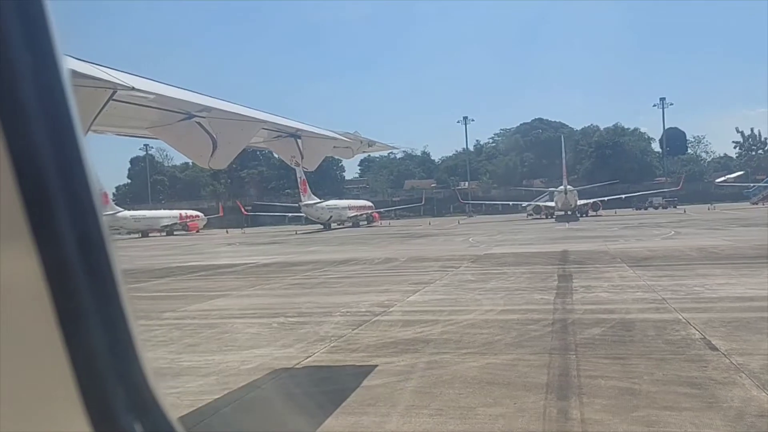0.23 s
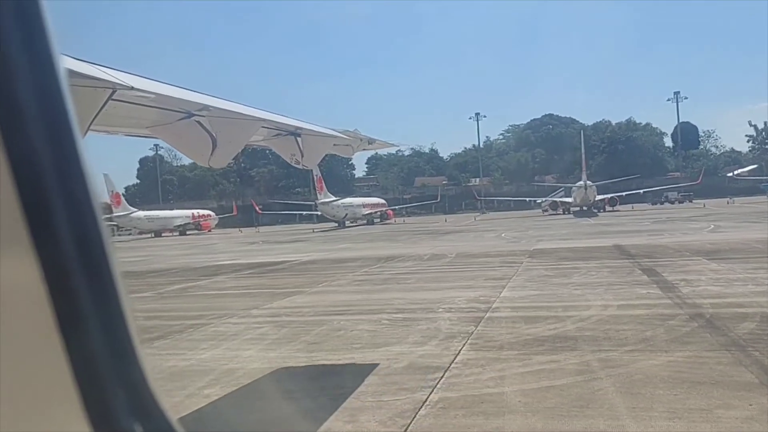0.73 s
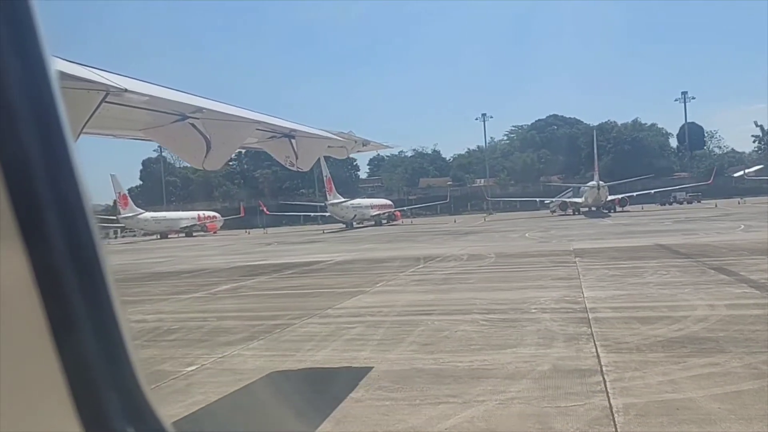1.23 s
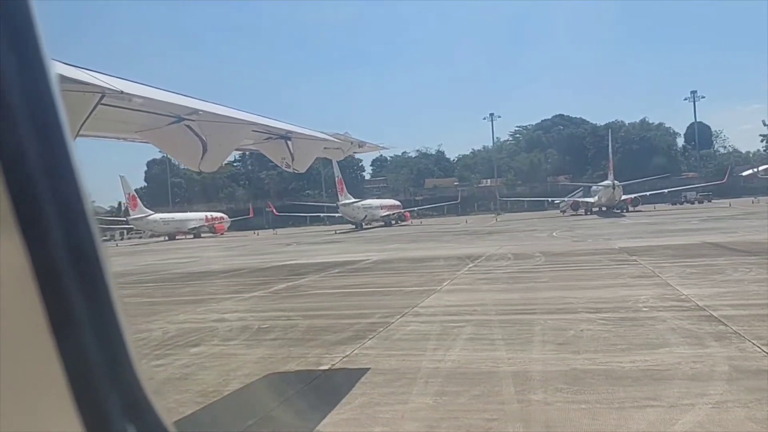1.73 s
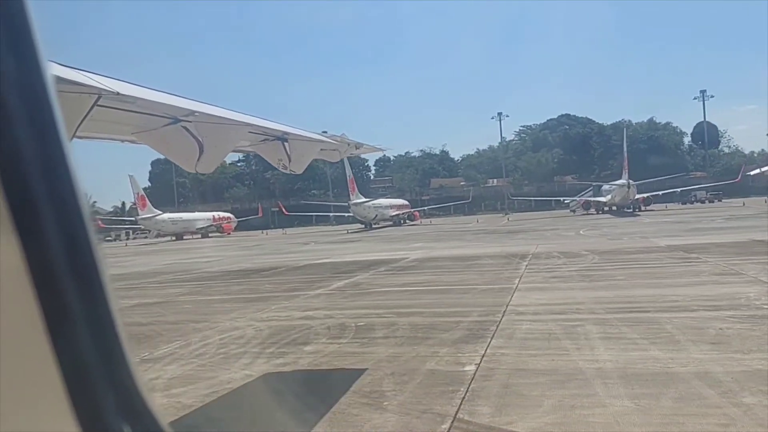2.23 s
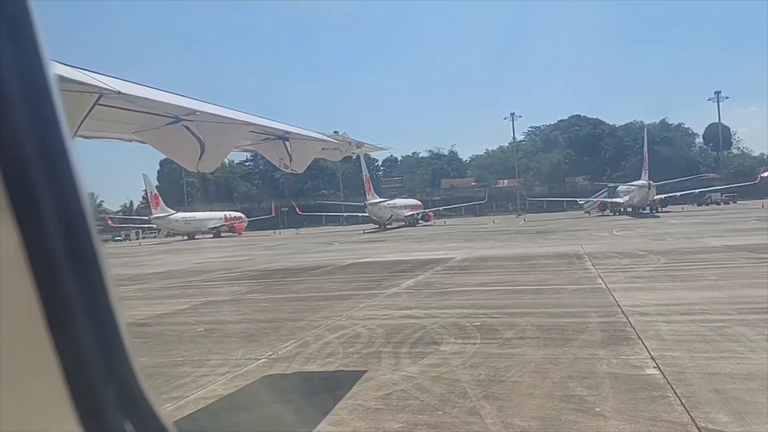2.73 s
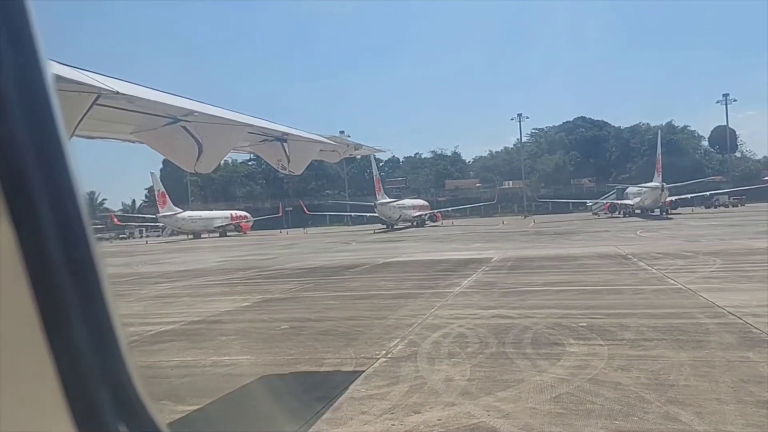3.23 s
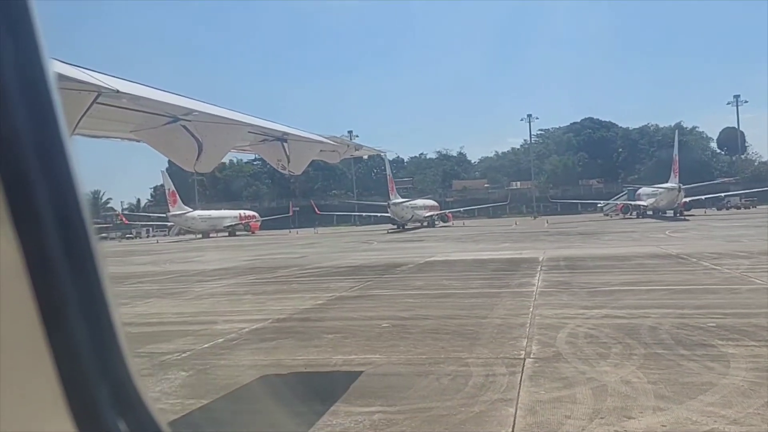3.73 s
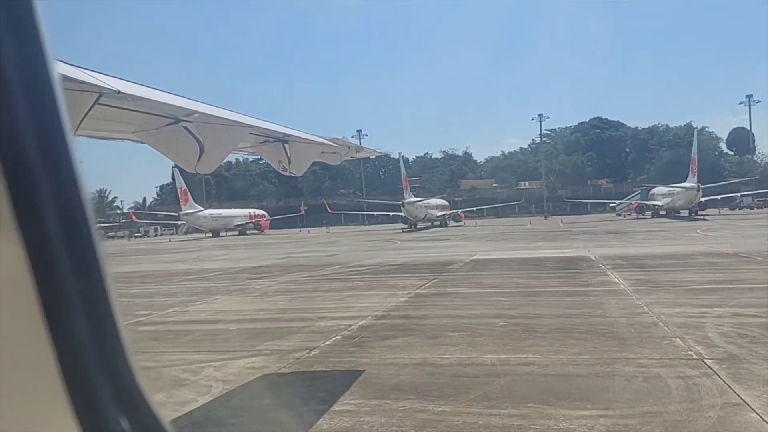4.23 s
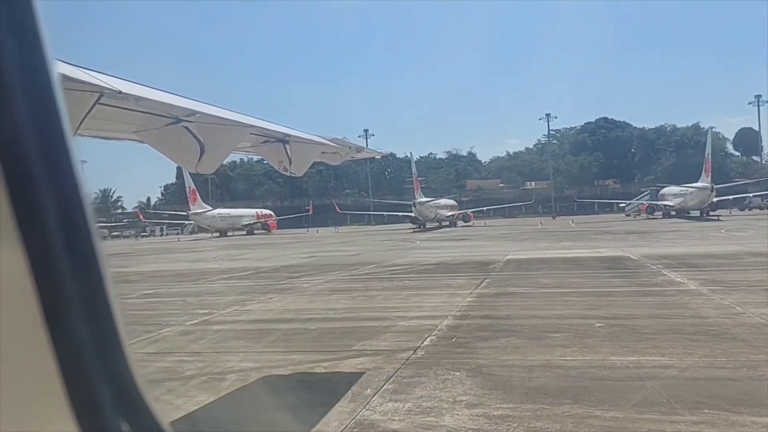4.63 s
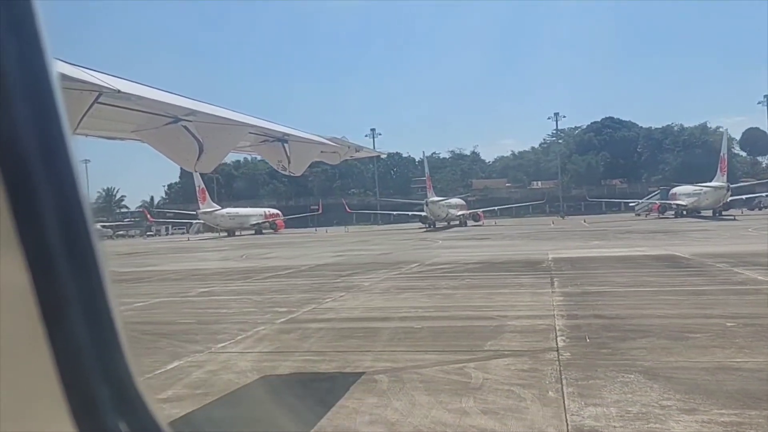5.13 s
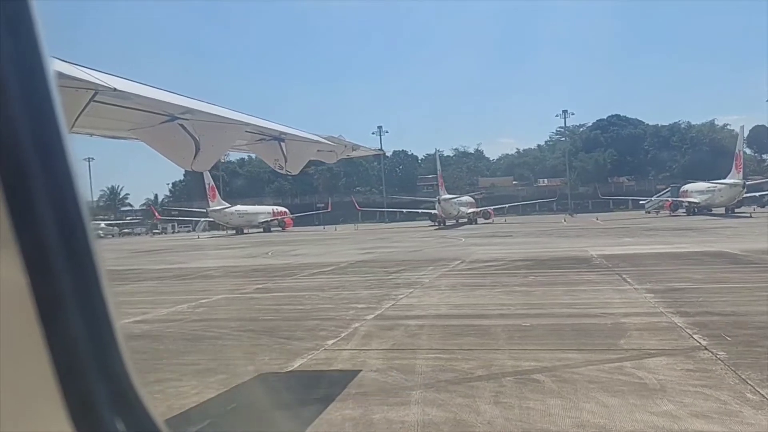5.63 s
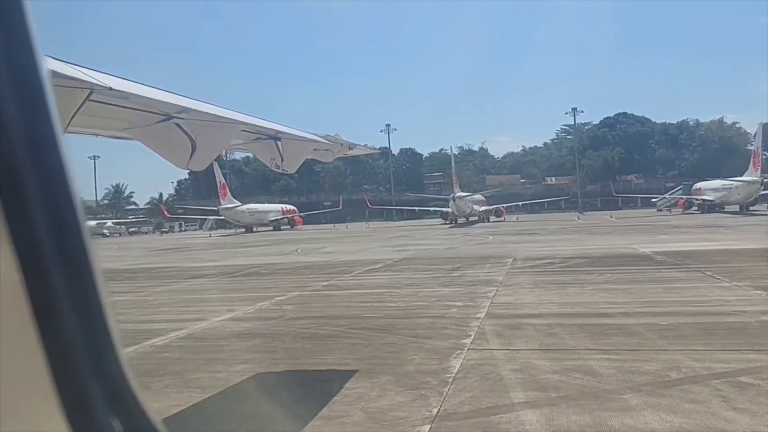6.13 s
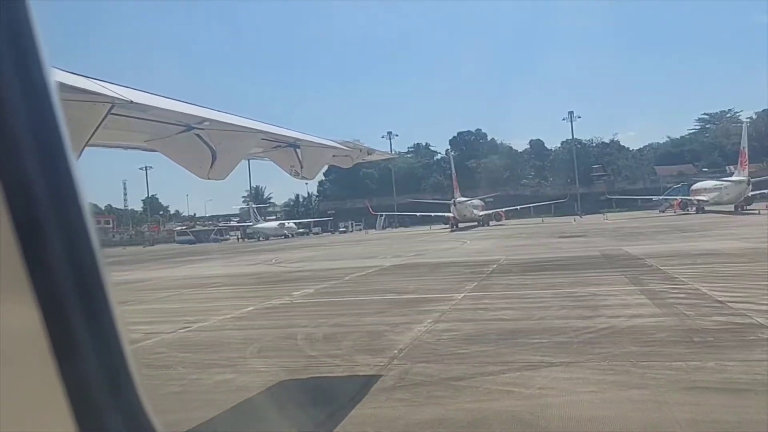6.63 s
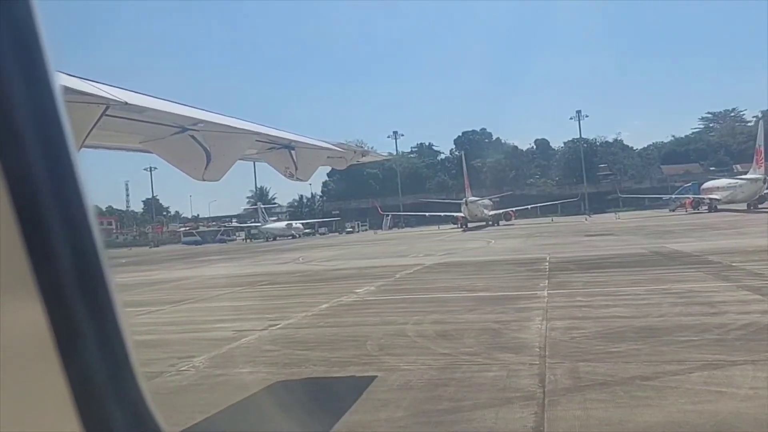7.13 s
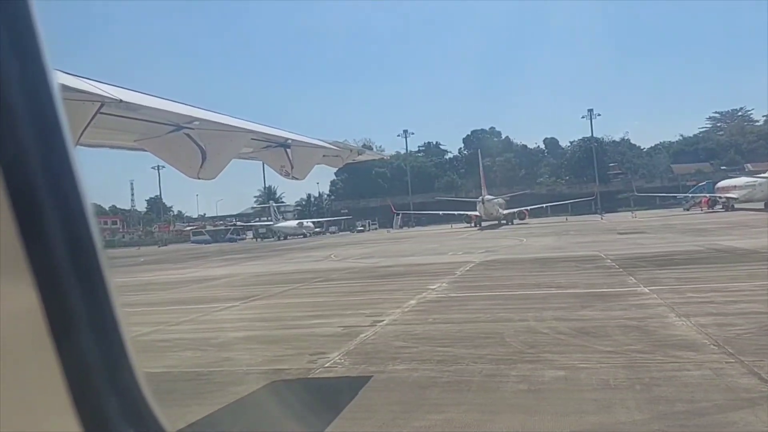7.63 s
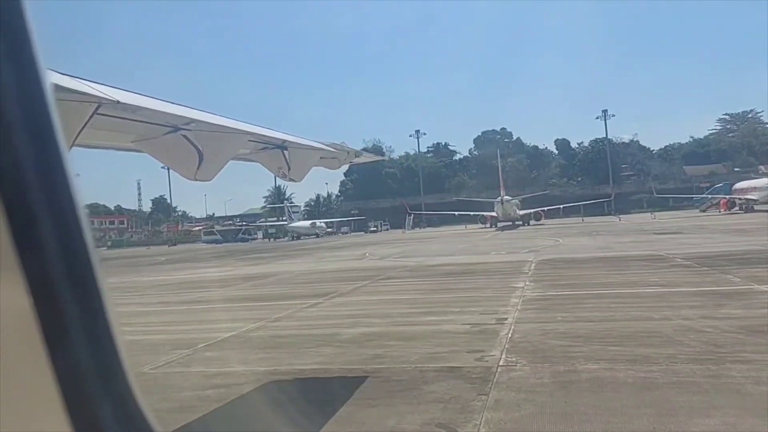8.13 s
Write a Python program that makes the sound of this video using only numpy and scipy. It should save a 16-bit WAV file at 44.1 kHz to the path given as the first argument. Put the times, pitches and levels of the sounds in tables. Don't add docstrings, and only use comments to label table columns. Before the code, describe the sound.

Heard from a seat inside a twin-propeller aircraft taxiing slowly over concrete. A deep, continuous drone throbs as two engines beat slightly out of tune, over bassy rolling rumble and soft air hiss. Every second or so the wheels bump a slab joint with a dull thud, hardest just before seven seconds. Brief high squeaks and tiny ticks come from a trim panel close on the right.

```python
import sys
import numpy as np
from scipy import signal
from scipy.fft import rfft, irfft, next_fast_len
from scipy.io import wavfile
from scipy.ndimage import uniform_filter1d

SR = 44100
rng = np.random.default_rng(int(sys.argv[2]) if len(sys.argv) > 2 else 0)


def gain_from_decibels(decibels):
    exponent = np.asarray(decibels, float) / 20
    return 10 ** exponent


def materialize(psi):
    bounded = np.clip(np.atleast_2d(psi).T, -1, 1)
    quanta = np.round(bounded * 32767).astype(np.int16)
    wavfile.write(sys.argv[1], SR, quanta)


N = 369999
FAST = next_fast_len(N)
HZ = np.fft.rfftfreq(FAST, 1 / SR) + 1e-3
TIME = np.arange(N) / SR
LEFT_LEAD_S = 0.00018

# (time [s], level [dB])
AIR = [(0.05, -41.5), (1.77, -42.5), (3.11, -39.5), (3.13, -42.5), (5.26, -42), (6.76, -38), (7.59, -41.5),
       (8.25, -39), (8.3, -39.5)]


def rms_one(x):
    return x / np.sqrt(np.mean(x ** 2) + 1e-20)


def in_time(rows):
    s, *columns = np.transpose(rows)
    return [np.interp(TIME, s, c) for c in columns]


def swing(rows):
    db, = in_time(rows)
    return db, db - db.mean()


def at_hz(points, hz):
    point_hz, value = np.array(points)[:, :2].T
    return np.interp(np.log(hz), np.log(point_hz), value)


def hump(hz, width):
    return 1 / (1 + (2 * (HZ - hz) / width) ** 2)


def ring(x, hz, t60):
    r, w = gain_from_decibels(-60 / (t60 * SR)), 2 * np.pi * hz / SR
    return signal.lfilter([0, np.sin(w)], [1, -2 * r * np.cos(w), r * r], x)


def drift(rate):
    count, hop = 10000, 40
    hz = np.fft.rfftfreq(count, hop / SR)
    shape = (hz > 0) / (1 + (hz / rate) ** 2)
    slow = irfft(rfft(rng.standard_normal(count)) * shape, count)
    return rms_one(np.interp(np.arange(N) / hop, np.arange(count), slow))


def pan(x, lean_db):
    gains = gain_from_decibels(np.array([[.5], [-.5]]) * lean_db)
    return x * gains / np.mean(gains, axis=0)


def stereo_noise(gain):
    # (frequency [Hz], correlation [-1 to 1])
    likeness = [(60, 1), (99, 0.96), (160, 1), (270, 0.78), (450, 0.58), (740, 0.63), (1220, -0.31),
                (2010, -0.13), (3330, -0.03), (5500, 0.04), (9080, -0.01), (15000, -0.29)]
    # (frequency [Hz], left minus right [dB])
    port_lean = [(60, -2), (99, -2.5), (160, -1), (270, -4.5), (450, 1), (740, -7), (1220, -5),
                 (2010, -9.0), (3330, -14), (5500, -13.5), (9080, -5.5), (15000, -4.5)]
    alike = np.clip(at_hz(likeness, HZ), -.99, .998)
    mid, side = rfft(rng.standard_normal((2, FAST)))
    both = gain * (np.sqrt(1 + alike) * mid + np.sqrt(1 - alike) * side * [[1], [-1]])
    lead_s = LEFT_LEAD_S / (1 + (HZ / 400) ** 2)
    both = both * np.exp(1j * np.pi * HZ * lead_s * np.array([[1], [-1]]))
    both = irfft(pan(both, at_hz(port_lean, HZ)), FAST)[:, :N]
    return both / np.std(both.mean(axis=0))


def colour(spectrum):
    # (frequency [Hz], width [Hz], lift [dB])
    cavities = [(420, 4.4, -2), (746, 32, 0.5), (9100, 450, 0.5), (1550, 140, 1), (2320, 130, 3),
                (4860, 990, 1), (7260, 1200, 2.5), (13000, 1500, 1.5)]
    lift_db = sum(db * hump(hz, width) for hz, width, db in cavities)
    inside = (HZ >= spectrum[0][0]) & (HZ <= spectrum[-1][0])
    return gain_from_decibels(at_hz(spectrum, HZ) + lift_db) * inside


def evened(x, span_s):
    power = uniform_filter1d(x.mean(axis=0) ** 2, int(span_s * SR))
    return x / np.sqrt(power + 1e-3)


def tone(hz, wander_hz, lean_db):
    turns = np.cumsum(hz + wander_hz * drift(2.38)) / SR + rng.random()
    turns = turns + np.outer([LEFT_LEAD_S, 0], hz + 0 * TIME)
    return pan(np.sqrt(2) * np.sin(2 * np.pi * turns), lean_db)


def airflow():
    # (frequency [Hz], density [dB per Hz])
    slipstream = [(160, -30), (270, -3), (297, -11), (414, -5), (459, -10.5), (604, -15.5), (728, -18),
                  (999, -25), (1400, -34), (1820, -63.5), (3080, -120)]
    # (frequency [Hz], density [dB per Hz])
    vent_spectrum = [(650, -32.5), (1100, 1.5), (1240, -2.5), (1590, -1), (2000, -3), (2360, -0.5),
                     (2920, -4), (3560, -9), (3680, -10.5), (4860, -11), (5490, -19.5), (7000, -19),
                     (10200, -29.5), (13200, -31), (15700, -37.5)]
    # (time [s], lift [dB], half length [s])
    shakes = [(.5, 3.5, .12), (1.0, 3, 0.065), (3.2, 0.5, .07), (3.49, 5, 0.014), (3.64, 5, 0.018),
              (4.527, 2, 0.033), (4.855, 0, .1), (5.9, 3.5, .04), (6.9, 4, .13), (7.58, 1, 0.074)]
    air_db, gust_db = swing(AIR)
    skin = gain_from_decibels(air_db + 7 + 0.65 * drift(6)) * stereo_noise(colour(slipstream))
    top = 1 / np.sqrt(1 + (8500 / HZ) ** 8)
    hiss = colour(vent_spectrum)
    vent_db = -47 + 0.39 * gust_db + 0.7 * drift(13) + 0.3 * drift(1.2)
    vent = gain_from_decibels(vent_db) * stereo_noise(hiss * np.sqrt(1 - top ** 2))
    shake_db = sum(db * np.exp(-((TIME - s) / half_s) ** 4) for s, db, half_s in shakes)
    buzz_db = -71.5 + shake_db + 4.0 + 1.2 * drift(25)
    return skin + vent + gain_from_decibels(buzz_db) * stereo_noise(hiss * top)


def machinery():
    # (time [s], level [dB])
    boom_load = [(0.0, -24), (0.07, -43), (0.3, -20), (0.51, -27.5), (0.72, -15.5), (1.8, -34.5),
                 (1.87, -24.5), (2.85, -21.5), (2.97, -52), (3.04, -27.5), (4.49, -23), (5.05, -31),
                 (5.4, -20), (5.51, -34), (6.52, -20.5), (6.66, -40), (6.71, -22), (8.39, -27.5)]
    # (start [Hz], end [Hz], level [dB], wander [Hz], left minus right [dB])
    whines = [(50.7, 50.5, -39, 0.45, 0), (84.36, 84.8, -33, 0.56, -3), (1080, 1300, -73, 2.3, 3),
              (3000, 3400, -75, 1.5, -13.5), (3494, 3499, -63, 0.51, -18), (4070, 4133, -76.5, 1.4, -12.5)]
    load_db, = in_time(boom_load)
    out = np.zeros((2, N))
    for hz in (127.5, 130.2):
        out += gain_from_decibels(load_db - 3.5 + 2.5 * drift(7.8)) * tone(hz, wander_hz=0.75, lean_db=-2.1)
    pump_on_s, pump_rise_s = 5.3, 1.2
    pump = gain_from_decibels(-61.5) * np.clip((TIME - pump_on_s) / pump_rise_s, 0, 1)
    out += pump * tone(3092, wander_hz=4.8, lean_db=-17)
    for start_hz, end_hz, db, wander_hz, lean_db in whines:
        glide_hz = np.linspace(start_hz, end_hz, N)
        out += gain_from_decibels(db + 3.0 * drift(1.8)) * tone(glide_hz, wander_hz, lean_db)
    return out


def ticks():
    # (time [s], peak [dB], left minus right [dB], ring [s])
    impacts = [(0.211, -55, -1.5, .015), (2.022, -56, -3.5, 0.014), (3.193, -48.5, -9.5, .015),
               (3.226, -57, 0.5, 0.017), (3.625, -56, -5, 0.011), (4.338, -42.5, -7, 0.071),
               (4.6, -50.5, -6, 0.011), (4.622, -56, -7, .01), (4.84, -54, -10.5, 0.026),
               (6.093, -57, -4.5, .02), (6.767, -55.5, -5.5, 0.0085), (6.859, -56.5, 1, .015),
               (7.013, -49.5, -8.5, .03)]
    # (frequency [Hz], width [Hz], level [dB])
    buckle = [(5900, 880, -1), (7000, 1900, 4), (13000, 2300, -8)]
    # (time [s], peak [dB], left minus right [dB])
    bare_snap = (6.7848, -27, 0.92)
    bright = sum(gain_from_decibels(db) * hump(hz, width) ** 2 for hz, width, db in buckle) + .12 * (HZ > 3000)
    noise = rms_one(irfft(rfft(rng.standard_normal((2, FAST))) * bright, FAST)[:, :N])
    envelope = np.zeros((2, N))
    for s, db, lean_db, ring_s in impacts:
        decay_db = 24 * np.maximum(TIME - s, 0) / ring_s
        envelope += pan(gain_from_decibels(db - decay_db) * (TIME >= s), lean_db)
    s, db, lean_db = bare_snap
    snap = gain_from_decibels(db) * signal.lfilter([1, .15], [1], np.arange(N) == int(s * SR))
    return envelope * noise + pan(snap, lean_db)


def squeaks():
    # (time [s], peak [dB], ring [Hz])
    slips = [(0.1495, -45, 4770), (0.2102, -30.5, 4850), (0.828, -41.5, 4750), (1.8406, -41.5, 4734),
             (1.8755, -38.5, 4640), (2.0205, -42.5, 4350), (2.185, -39, 4770), (2.664, -36.5, 4860),
             (2.686, -33.5, 4800), (3.1145, -35.5, 4860), (3.194, -37.5, 4500), (3.226, -33, 4720),
             (3.372, -44.5, 4840), (3.422, -44.5, 4830), (3.5791, -33, 4880), (3.6248, -33.5, 4840),
             (4.513, -32, 4750), (4.8391, -35, 4900), (4.8954, -34.5, 4900), (5.874, -41.5, 4780),
             (6.091, -43, 4550), (6.712, -39, 4840), (6.766, -38.5, 4860), (6.8295, -30, 4930),
             (6.8588, -33, 5100), (7.012, -35, 5220), (7.512, -39.5, 4920), (7.557, -34, 4900),
             (7.587, -33, 4860), (7.631, -38, 4880)]
    # (time [s], peak [dB], ring [Hz])
    more_slips = [(1.76, -48, 4860), (2.063, -46.5, 4500), (3.03, -48, 4860), (3.1935, -41, 4070),
                  (3.1945, -41, 5000), (3.54, -48.5, 4830), (4.283, -46, 4840), (4.6034, -46.5, 4320),
                  (4.804, -42.5, 4740), (6.7835, -42, 4600), (6.9287, -46, 4620), (6.9687, -45, 4900),
                  (7.898, -42.5, 4740), (8.0747, -41.5, 4940)]
    # (share of ring Hz, level [dB], t60 [s], delay [s])
    panel_modes = [(.92, -10.5, 0.0036, 0.0028), (1.0, 1.5, 0.011, 0.00013), (1.07, -4, 0.0042, 0.003),
                   (1.14, -7, 0.0099, .003)]
    length, slip_s = 2000, 0.005
    out, t = np.zeros((2, N + length)), np.arange(length) / SR
    slip = np.sin(np.pi * np.clip(t / slip_s, 0, 1)) ** 2
    catch = 0.33 * np.interp(t - slip_s, t, slip, 0)
    tremor = 0.1 * t / 0.0048 * np.exp(-t / 0.015)
    rub = slip + catch + tremor
    for s, db, hz in slips + more_slips:
        noise = rng.standard_normal((2, length))
        chatter = np.sin(2 * np.pi * hz * t * (.985 + 4.8 * t)) + 1.8 * noise
        body = np.zeros((2, length))
        for share, mode_db, t60, delay in panel_modes:
            push = np.interp(t - delay, t, rub, 0) * chatter
            body += gain_from_decibels(mode_db) * ring(push, hz * share, t60)
        body = ring(body, hz, 0.0022)
        scrape = gain_from_decibels(-31) * rub * np.diff(noise, prepend=0)
        body = body / np.abs(body).max(axis=1, keepdims=True) + scrape
        lean_db = -13 + 3 * noise[0, 0]
        at = max(int((s - slip_s / 2.1) * SR), 0)
        out[:, at:at + length] += pan(gain_from_decibels(db + 0.5) * body, lean_db)
    return out[:, :N]


def joints():
    # (time [s], peak [dB], hull note [Hz], t60 [s])
    slab_joints = [
        (0.469, -5, 63.5, 0.42),
        (1.822, -15.5, 80, 0.44),
        (3.169, -13.5, 81.3, 0.51),
        (4.51, -6.5, 64.5, 0.41),
        (5.82, -16, 62.6, 0.8),
        (6.926, 0.5, 151.6, 0.11),
        (6.919, -3.5, 88.3, 0.18),
        (7.731, -6.5, 84.5, 0.4),
    ]
    out = np.zeros(N)
    for s, db, hz, t60 in slab_joints:
        t = np.maximum(TIME - s, 0)
        swell = 1 - np.exp(-t * hz / 0.87)
        out += gain_from_decibels(db - 60 * t / t60) * swell * np.sin(2 * np.pi * hz * t)
    return pan(out, -2.4)


def rolling():
    # (time [s], level [dB])
    roughness = [(0.0, -16), (0.4, -23), (0.54, -22), (0.61, -23.5), (3.15, -21), (3.2, -11.5), (3.36, -26),
                 (4.44, -22.5), (4.55, -18), (4.67, -24), (5.51, -18.5), (5.65, -30), (5.73, -18.5),
                 (6.87, -22.5), (6.92, -20.5), (7.48, -22.5), (7.78, -19.5), (8.39, -19.5)]
    # (frequency [Hz], density [dB per Hz])
    rumble = [(30, -29.5), (44, -15.5), (56, -3), (64, 1), (80, -0.5), (98, 2.5), (112, 2), (140, -2.5),
              (155, -11.5), (180, -11.5), (225, -10), (265, -13.5), (300, -26), (370, -19)]
    deep_db, rough_db = swing(roughness)
    hull = colour(rumble)
    deep = 1 / np.sqrt(1 + (HZ / 125) ** 12)
    low = evened(stereo_noise(hull * deep), span_s=.2)
    high = evened(stereo_noise(hull * np.sqrt(1 - deep ** 2)), span_s=0.14)
    low_db = deep_db - .5 + 1.5 * drift(1.0)
    high_db = -22.5 + 0.11 * rough_db + 1.5 * drift(1.0)
    return gain_from_decibels(low_db) * low + gain_from_decibels(high_db) * high


def propellers():
    # (near propeller [Hz], far propeller [Hz])
    blade_hz = [81.54, 84.46]
    # (multiple of blade rate, near [dB], far [dB], smear [Hz])
    orders = [(1, -33, -32, 6.2), (2, -32.5, -36.5, 5.9), (3, -45, -39, 8.6), (4, -41, -40.5, 22),
              (5, -43.5, -46.5, 20), (6, -44.5, -49, 13), (7, -56, -60.5, 6.7), (9, -56, -65.5, 67)]
    # (time [s], level [dB])
    blade_load = [(0.0, -28), (1.29, -28), (1.33, -37.5), (1.73, -25), (2.17, -38.5), (2.66, -26.5),
                  (2.76, -42), (3.01, -23), (3.55, -46.5), (3.9, -22.5), (4.18, -33), (4.79, -25),
                  (4.88, -38.5), (7.36, -28), (7.59, -44), (8.39, -32.5)]
    near_hz, far_hz = blade_hz
    power = 0
    for k, near_db, far_db, width in orders:
        power = power + (gain_from_decibels(near_db) * hump(k * near_hz, width)) ** 2 / width
        power = power + (gain_from_decibels(far_db) * hump(k * far_hz, width)) ** 2 / width
    smeared = gain_from_decibels(-26.0) * stereo_noise(np.sqrt(power))
    third_db = in_time(blade_load)[0] + 0.8 + 0.7 * drift(4.0)
    third = gain_from_decibels(third_db) * tone(3 * near_hz, wander_hz=0.3, lean_db=-2.5)
    fifth_db = -43.5 + 0.5 * swing(AIR)[1] + 4.5 * drift(1.8)
    fifth = gain_from_decibels(fifth_db) * tone(5 * near_hz, wander_hz=1.5, lean_db=-1.0)
    return smeared + third + fifth


def scene():
    return airflow() + machinery() + ticks() + squeaks() + joints() + rolling() + propellers()


def band_limit(x):
    return signal.sosfilt(signal.butter(12, 15710, fs=SR, output="sos"), x)


def record(dry):
    mix = 1.578 * np.tanh(dry / 1.568)
    return band_limit(mix)


dry = scene()
out = record(dry)
materialize(out)
```